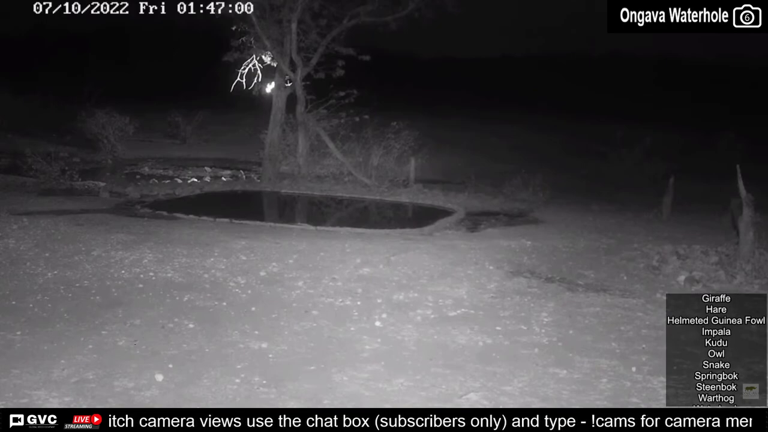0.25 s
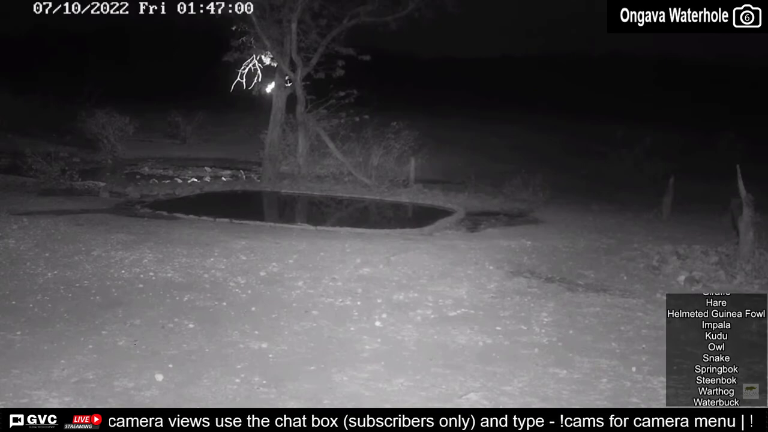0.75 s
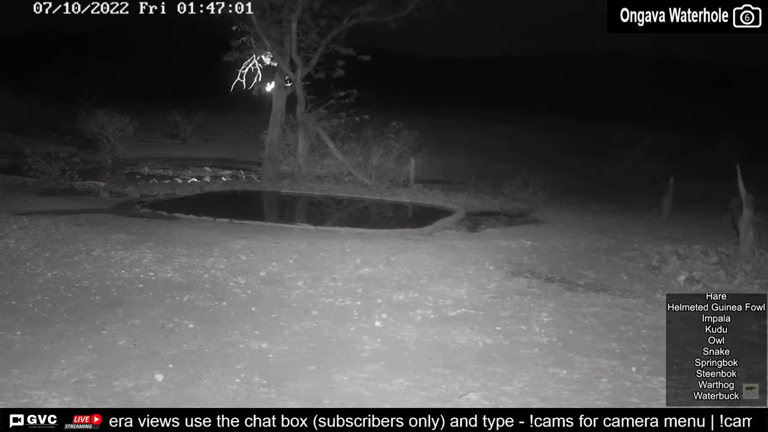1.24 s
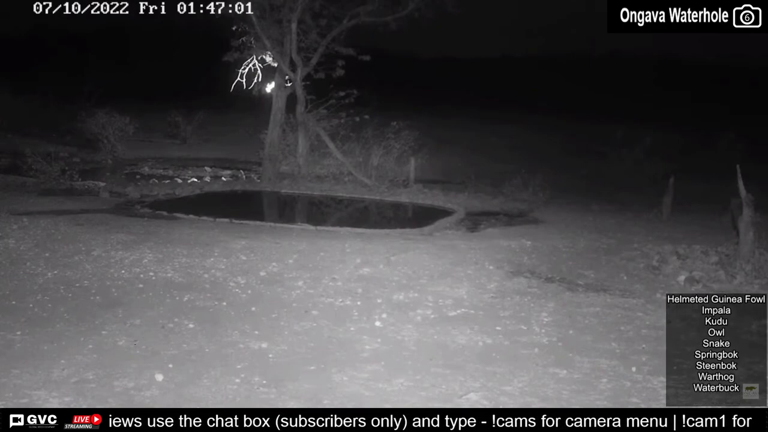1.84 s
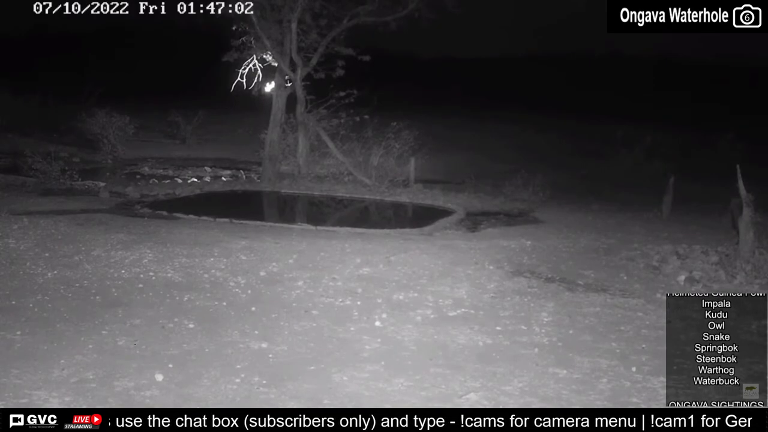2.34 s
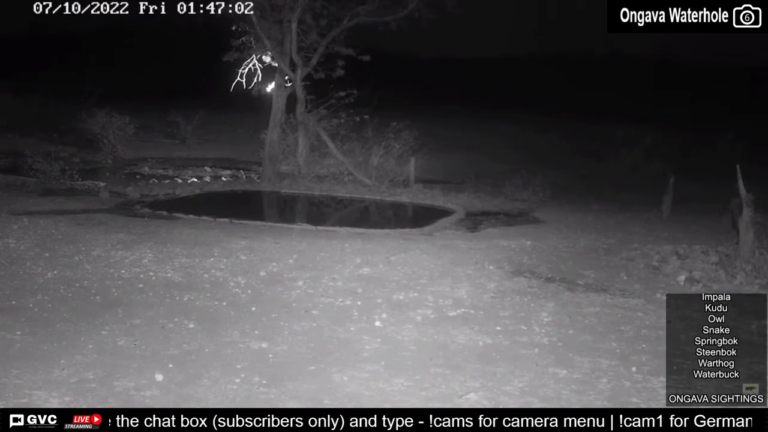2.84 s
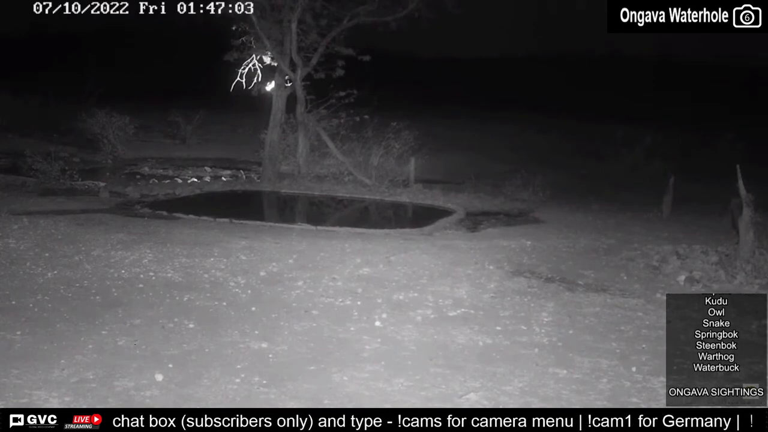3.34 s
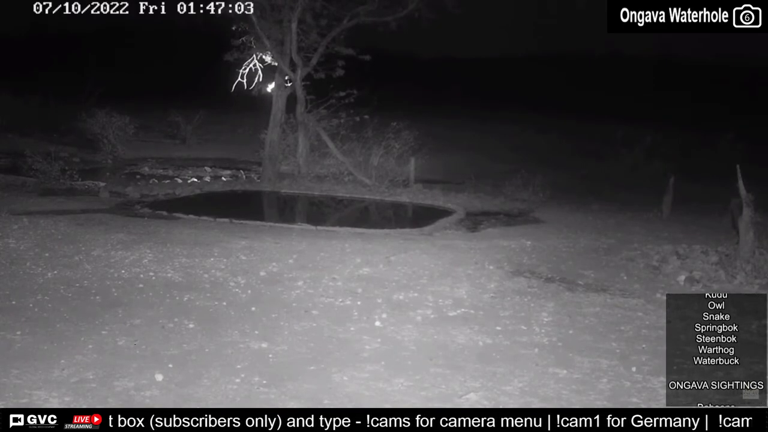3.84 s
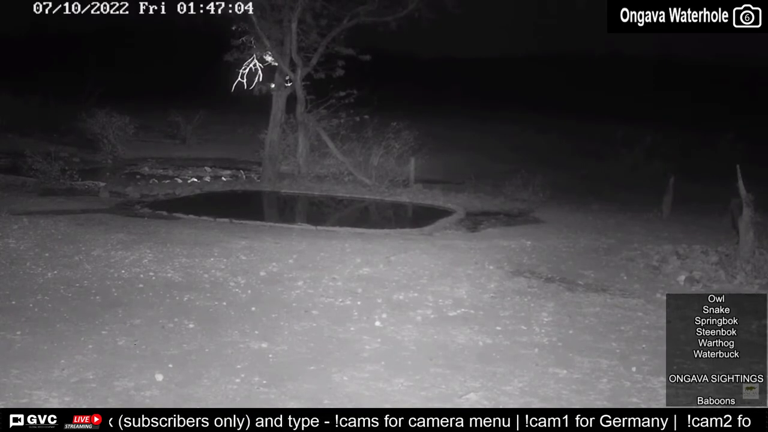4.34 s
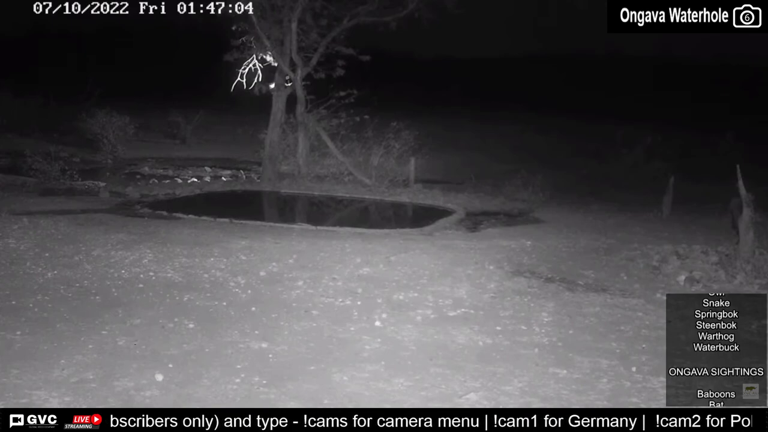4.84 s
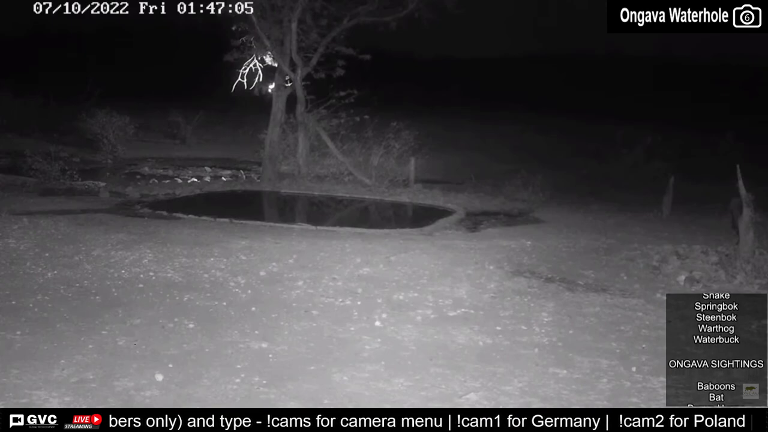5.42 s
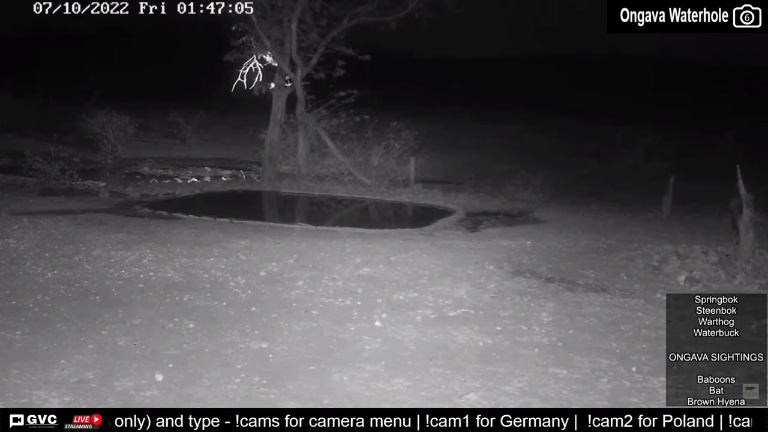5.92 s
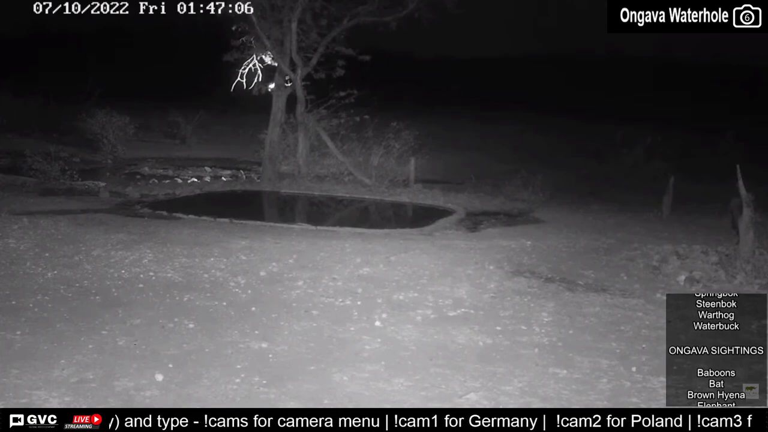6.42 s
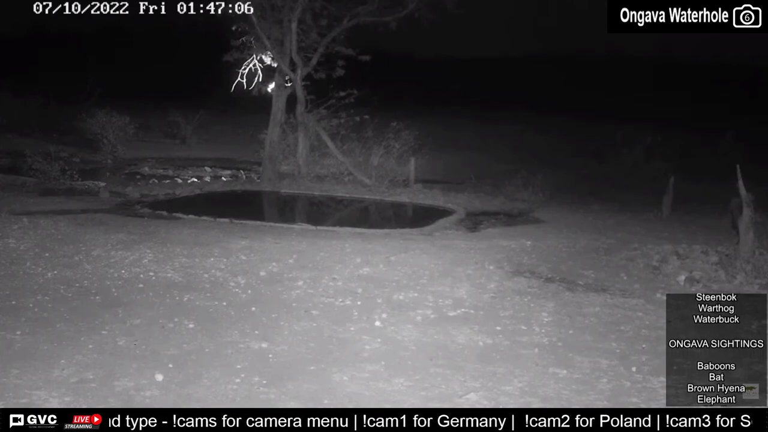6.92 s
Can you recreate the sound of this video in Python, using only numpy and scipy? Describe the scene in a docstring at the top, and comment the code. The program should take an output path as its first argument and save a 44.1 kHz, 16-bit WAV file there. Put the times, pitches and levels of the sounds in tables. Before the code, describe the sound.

At a waterhole in dry bush at night, one cricket holds a high, unbroken trill almost straight ahead. Two tree crickets on the right chirp nearly together, a little under twice a second, while a fainter one on the left comes in just before them. Behind them are thin, higher insects, a blurred distant chorus and a few soft plinks. Faint hiss and a very low rumble lie under the quiet, wide sound.

```python
"""A waterhole in dry bush at night. One cricket trills without a pause almost straight ahead; two tree
crickets on the right chirp nearly in step, their wing strokes beating, and a third leads them from further
off on the left. Every stroke is a file scraped across a wing, ringing it in a short falling tone.
Behind them: fainter insects, a blurred far chorus, soft plinks, one tick, thin hiss and a low rumble."""
import sys
import numpy as np
from scipy import signal
from scipy.fft import rfft, irfft
from scipy.io import wavfile
from scipy.ndimage import uniform_filter1d

SR = 44100
rng = np.random.default_rng(int(sys.argv[2]) if len(sys.argv) > 2 else 0)


def persist_wave(psi):
    """Save psi, clipped to +-1, as 16-bit WAV."""
    counts = np.round(np.clip(psi, -1, 1) * 32767).astype(np.int16)
    wavfile.write(sys.argv[1], SR, np.atleast_2d(counts).T)


N = 316312
TIME = np.arange(N) / SR
FREQ = np.maximum(np.arange(N // 2 + 1) * SR / N, 1)


def undb(db):
    """Decibels to gain."""
    return 10 ** (np.asarray(db) / 20)


def place(x, pan_db):
    """Constant-power pan; every pan here is left minus right in dB."""
    gains = undb(np.array([[pan_db], [-pan_db]]) / 2)
    return x * gains / np.sqrt(np.mean(gains ** 2))


def add(track, at_s, sound):
    """Mix a sound into a track, centred on the given time."""
    start = int(at_s * SR) - sound.shape[-1] // 2
    lo, hi = max(start, 0), min(start + sound.shape[-1], N)
    if hi > lo:
        track[..., lo:hi] += sound[..., lo - start:hi - start]


def drift(rate_hz):
    """A smooth random modulator with a spread of 1."""
    hold = max(int(SR / rate_hz), 1)
    steps = np.repeat(rng.standard_normal(N // hold + 1), hold)
    slewed = uniform_filter1d(steps, hold)[:N]
    return slewed / slewed.std()


def band(hz, width_hz):
    """Wide stereo noise through one resonance, rms 1."""
    resonance = 1 / (1 + 2 * ((FREQ - hz) / width_hz) ** 2)
    noise = irfft(rfft(rng.standard_normal((2, N))) * resonance, N)
    return noise / noise.std()


def bush(x, t60_s, wet_db):
    """Ground and shrubs scatter a diffuse tail of up to half a second, different at each ear."""
    t = TIME[:SR // 2]
    tail = rng.standard_normal((2, len(t))) * np.exp(-np.log(1000) * t / t60_s) * (t > .004)
    tail /= np.sqrt(np.sum(tail ** 2, axis=1, keepdims=True))
    return x + undb(wet_db) * signal.fftconvolve(x, tail, axes=1)[:, :N]


def stroke(hz, fall, length_s, overtone_db, bend, edge, peak_late=1):
    """One closing of the wings: the file rings them in a near sine that sinks as the scraper slows."""
    progress = np.linspace(0, 1, max(int(length_s * SR), 2))
    pitch = hz * (1 - fall * progress ** bend)
    phase = 2 * np.pi * (np.cumsum(pitch) / SR + rng.random())
    envelope = np.abs(np.sin(np.pi * progress ** peak_late)) ** edge
    return np.sqrt(2) * envelope * (np.sin(phase) + undb(overtone_db) * np.sin(2 * phase))


def trill(rate_hz=51.252, pitch_hz=2616, level_db=-41.4, scatter_db=.7, scatter_hz=9, jitter_s=.00018):
    """The lead cricket: an unbroken run of short wing strokes, nearly as even as a clock."""
    beats = .0156 + np.arange(-1, N / SR * rate_hz) / rate_hz
    out = np.zeros(N)
    for at, (force, tuning, slip) in zip(beats, rng.standard_normal((len(beats), 3))):
        hz = pitch_hz + scatter_hz * tuning
        note = stroke(hz, fall=.089, length_s=.013, overtone_db=-29, bend=2.2, edge=.74, peak_late=1.1)
        add(out, at + jitter_s * slip, undb(level_db + scatter_db * force) * note)
    return bush(place(out, pan_db=-2.8), t60_s=.15, wet_db=-19)


def tree_crickets(strokes=8, bright_db=-46, mellow_db=-46.7, left_db=-52, scatter_db=1, scatter_hz=10):
    """Each chirp is a burst of even wing strokes; overlapping neighbours beat against each other."""
    # wing voices by name: f/Hz, fall/share of f, stroke rate/Hz, stroke length/s, overtone/dB, pan/dB
    voices = {"bright": (2095, 0.07, 33.5, 0.0116, -13, -28),
              "mellow": (1989.5, 0.0422, 33, 0.0246, -30, -24), "left": (2016, 0.0167, 32.5, 0.03, -22, 25)}
    # rounds of chirps: bright's start t/s, mellow's lag/s, mellow's strokes, left's lead/s,
    # effort of the right-hand pair/dB
    rounds = [(.289, 0.054, 8, 0.047, 0), (.901, .034, 8, 0.019, -0.5), (1.495, .029, 7, 0.029, -2),
              (2.089, 0.025, 7, 0.029, 1), (2.697, 0.041, 7, 0.078, 2.5), (3.282, .040, 8, .12, 1),
              (3.896, .062, 8, .19, 1), (4.498, 0.066, 8, .16, -0.5), (5.119, .025, 8, .18, .5),
              (5.730, 0.03, 8, 0.12, 1.5), (6.328, 0.057, 8, .11, -.5), (6.913, .058, 8, .13, -1)]
    out = np.zeros((2, N))
    for at, lag_s, mellow_strokes, lead_s, effort_db in rounds:
        entries = [("left", at - lead_s, strokes, left_db),
                   ("bright", at, strokes, bright_db + effort_db),
                   ("mellow", at + lag_s, mellow_strokes, mellow_db + effort_db)]
        for who, start, count, db in entries:
            hz, fall, rate, length_s, overtone_db, pan_db = voices[who]
            for k, (force, tuning) in enumerate(rng.standard_normal((count, 2))):
                note = stroke(hz + scatter_hz * tuning, fall, length_s, overtone_db, bend=1.1, edge=.6)
                add(out, start + k / rate, place(note, pan_db) * undb(db + scatter_db * force))
    # they sit close by, so each chirp stops short; only a faint echo comes back from the trees
    near = bush(out, t60_s=.09, wet_db=-6.5)
    return bush(near, t60_s=1.6, wet_db=-18.5)


def far_insects(wander_s=.012, scatter_db=2.5, detune=.012):
    """Each repeats its own phrase of falling strokes, loose in time and tune."""
    # callers: first stroke t/s, phrase period/s, strokes per phrase, stroke rate/Hz, f/Hz,
    # fall/share of f, stroke length/s, level/dB, pan/dB
    callers = [(.18, .357, 4, 16.7, 3810, 0.0835, 0.0302, -63.3, 2.5),
               (.32, .415, 3, 16.7, 4400, 0.033, .026, -61.5, 1),
               (.70, .43, 3, 16.5, 4340, 0.057, .026, -64.5, -14),
               (0, .93, 40, 43, 2035, 0.053, .017, -57, 17)]
    out = np.zeros((2, N))
    for first, period, count, rate, hz, fall, length_s, db, pan_db in callers:
        for beat in np.arange(first, N / SR, period):
            start = beat + wander_s * rng.standard_normal()
            for k, (force, tuning) in enumerate(rng.standard_normal((count, 2))):
                pitch = hz * (1 + detune * tuning)
                note = stroke(pitch, fall, length_s, overtone_db=-40, bend=1.17, edge=.69)
                add(out, start + k / rate, place(note, pan_db) * undb(db + scatter_db * force))
    return bush(out, t60_s=.2, wet_db=-5)


def high_insect(rate_hz=14.1, pitch_hz=6700, level_db=-62, rise_s=3.9, scatter_db=2, jitter_s=.004):
    """Thin runs of falling strokes off to the right; each bout grows louder, then breaks off."""
    # bouts of song: from t/s, to t/s
    bouts = [(0, 5.4), (6.4, 7.17)]
    out = np.zeros(N)
    for first, last in bouts:
        beats = np.arange(first, last, 1 / rate_hz)
        for at, (force, tuning, slip) in zip(beats, rng.standard_normal((len(beats), 3))):
            hz = pitch_hz * (1 + .008 * tuning)
            note = stroke(hz, fall=.04, length_s=.036, overtone_db=-40, bend=1.6, edge=.9)
            fade_in_db = -6 * max(1 - (at - first) / rise_s, 0)
            add(out, at + jitter_s * slip, note * undb(level_db + fade_in_db + scatter_db * force))
    return bush(place(out, pan_db=-10), t60_s=.39, wet_db=-4.5)


def chorus(flicker_db=1.27, swell_db=.33):
    """Distant callers merge into shimmering bands that slowly swell and sink as one."""
    # bands of massed song: f/Hz, width/Hz, level/dB, pan/dB
    bands = [(1733, 110, -66, -2.5), (2020, 210, -59.5, 7), (2524, 256, -53.5, -4), (2770, 360, -58.5, -7),
             (5140, 200, -62, 0), (5236, 680, -55, -0.5), (5920, 1020, -61, -2)]
    shimmer = sum(place(band(hz, width), pan_db) * undb(db + flicker_db * drift(22))
                  for hz, width, db, pan_db in bands)
    return shimmer * undb(swell_db * drift(.803))


def plinks(t60_s=.073, rise_s=.0043, roughness=.487, spread_db=3.5, spread_octaves=.082):
    """Short, soft, rough rings: a few clear ones among many that are barely heard."""
    # clear plinks: t/s, peak level/dB, f/Hz, pan/dB
    clear = [(1.872, -54, 718, 0), (2.11, -55.5, 632, 0), (2.862, -58, 1133, -3), (3.206, -54.5, 1254, -2),
             (3.719, -57, 835.4, -1), (4.657, -51.5, 733, -7), (5.256, -54.5, 787, 0),
             (6.675, -51.5, 726, 2)]
    # random sprinkles of faint plinks: from t/s, to t/s, rate/Hz, centre f/Hz, typical peak level/dB
    sprinkles = [(0, 7.17, 7, 715, -63.5), (0, 7.17, 4, 1133, -63), (0, 7.17, 3, 1273, -62),
                 (3.6, 4.8, 6, 500, -62.5)]
    faint = []
    for first, last, rate, hz, db in sprinkles:
        count = int((last - first) * rate)
        for at, (force, tuning) in zip(rng.uniform(first, last, count), rng.standard_normal((count, 2))):
            faint.append((at, db + spread_db * force, hz * 2 ** (spread_octaves * tuning), -1))
    t = np.maximum(np.arange(-SR // 8, SR // 8) / SR, 0)  # the attack sits at the centre
    envelope = (1 - np.exp(-t / rise_s)) * np.exp(-np.log(1000) * t / t60_s)
    out = np.zeros((2, N))
    for at, db, hz, pan_db in list(clear) + faint:
        # the phase strays about `roughness` radians in a millisecond, which blurs the pitch
        stray = roughness * np.cumsum(rng.standard_normal(len(t))) / np.sqrt(SR // 1000)
        ring = np.sin(2 * np.pi * hz * t + stray) * envelope
        add(out, at, place(ring / np.abs(ring).max(), pan_db) * undb(db))
    return bush(out, t60_s=.19, wet_db=-13)


def tick(at_s=4.732, level_db=-52):
    """A lone thin tick: one quick downward sweep."""
    sweep = stroke(hz=4200, fall=.28, length_s=.005, overtone_db=-30, bend=.91, edge=1)
    out = np.zeros(N)
    add(out, at_s, undb(level_db) * sweep)
    return place(out, pan_db=-5)


def air(flicker_db=.7, crossover_hz=7000):
    """A faint bed of night air, brighter on the left, whose treble swells and flickers."""
    # spectrum of the air: f/Hz, level in a 1 Hz band/dB, pan/dB, likeness of the ears/0-1
    spectrum = [(60, -99, 2, .05), (250, -99, 0, .4), (380, -100.3, 0, .45), (560, -98.8, 0, .6),
                (720, -92.5, -1, .7), (960, -99, -1, .5), (1180, -94.3, -2.5, .3), (1480, -97.3, -2, .1),
                (3500, -94, -2, .1), (6500, -95.5, 0, .05), (7150, -102, 4, .05), (8200, -95.5, 10, .02),
                (11000, -91.5, 11, .02), (13800, -101, 11, .02), (15300, -115, 9, .02)]
    # level ride on the treble, applied about its mean: t/s, level/dB
    swell = [(0.1, -57.5), (0.91, -56.5), (2.88, -57.5), (3.0, -55.5), (3.29, -58.5), (4.12, -59),
             (4.4, -55.5), (5.1, -59), (5.88, -55.5), (5.96, -57), (6.73, -57.5), (7.0, -57.5)]
    hz, *columns = np.transpose(spectrum)
    db, pan_db, alike = (np.interp(np.log(FREQ), np.log(hz), column) for column in columns)
    noise = rfft(rng.standard_normal((3, N))) * np.sqrt(SR / 2)
    ears = np.sqrt(alike) * noise[0] + np.sqrt(1 - alike) * noise[1:]
    ears *= undb(db + np.array([pan_db, -pan_db]) / 2)
    treble = 1 / (1 + (crossover_hz / FREQ) ** 8)
    swell_db = np.interp(TIME, *np.transpose(swell))
    hiss = irfft(ears * treble, N) * undb(swell_db - swell_db.mean() + flicker_db * drift(90))
    return irfft(ears * (1 - treble), N) + hiss


def rumble(level_db=-65.5, sway_db=1.7, gust_at_s=5.98, gust_half_width_s=.65, gust_db=7):
    """The low rumble of the air sways gently; one soft gust lifts it."""
    gust = np.exp(-((TIME - gust_at_s) / gust_half_width_s) ** 2)
    sub = place(band(hz=18, width_hz=12.7), pan_db=4.5)
    return sub * undb(level_db + gust_db * gust + sway_db * drift(3))


def scene():
    """All the callers over the night air."""
    insects = trill() + tree_crickets() + far_insects() + high_insect() + chorus()
    return insects + plinks() + tick() + air() + rumble()


def record(dry):
    """A steep low-pass takes off the very top."""
    cutoff_hz = 15500
    return signal.sosfilt(signal.ellip(8, .2, 70, cutoff_hz, fs=SR, output="sos"), dry)


dry = scene()
out = record(dry)
persist_wave(out)
```